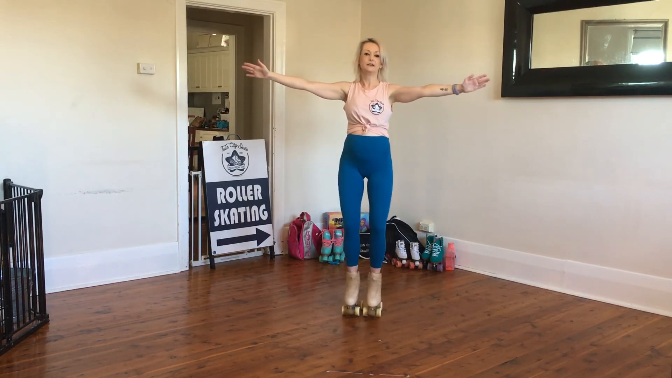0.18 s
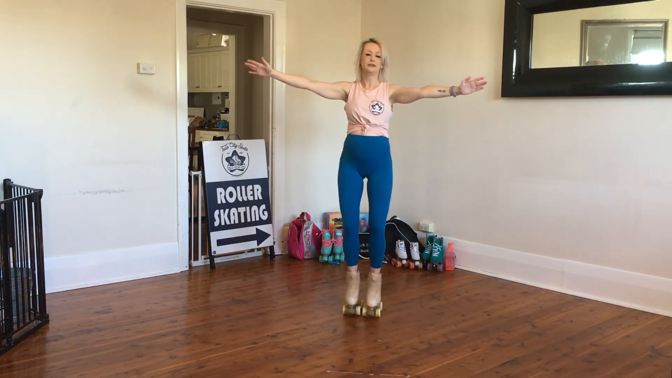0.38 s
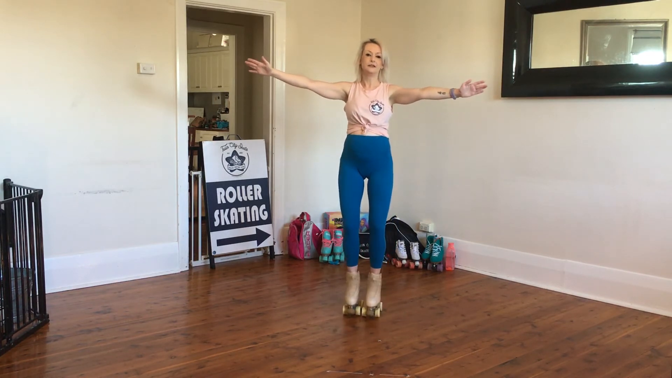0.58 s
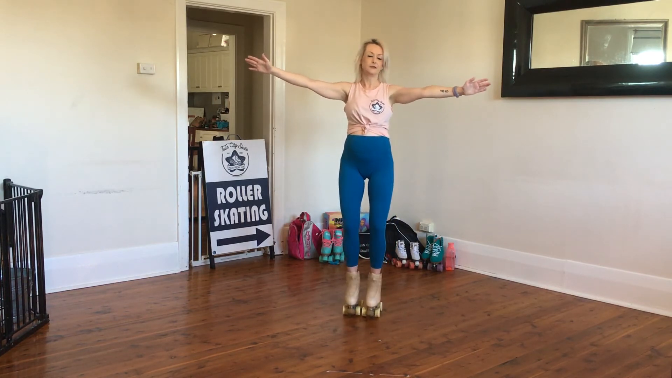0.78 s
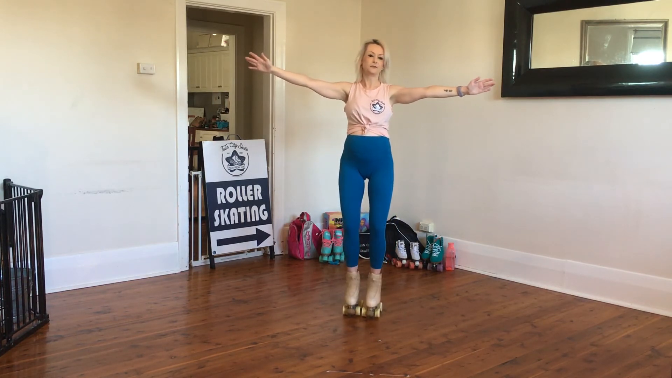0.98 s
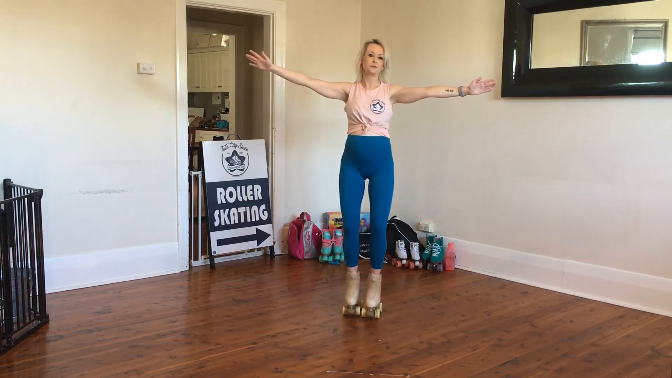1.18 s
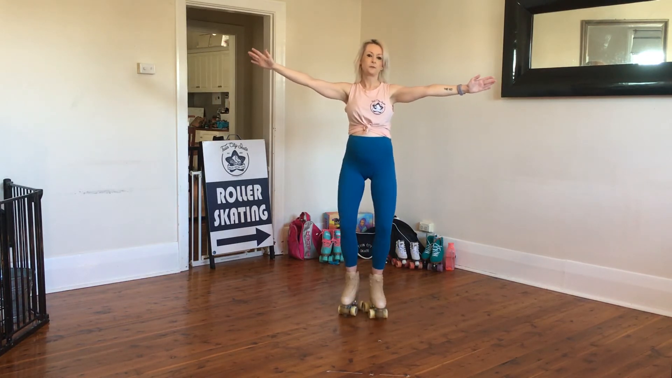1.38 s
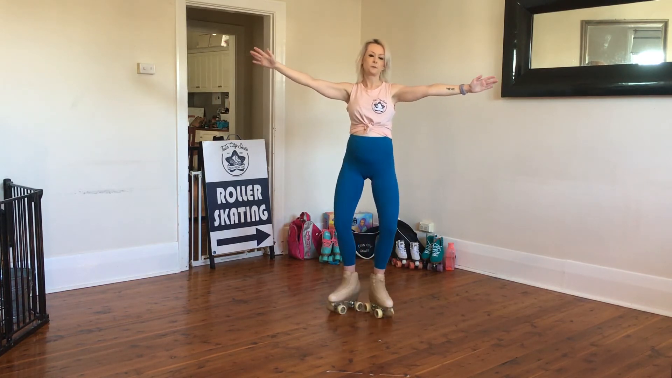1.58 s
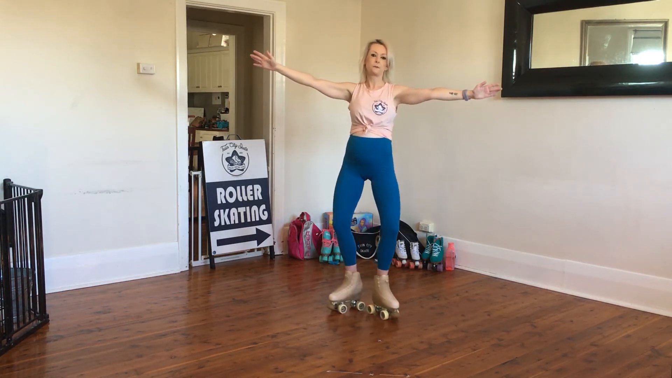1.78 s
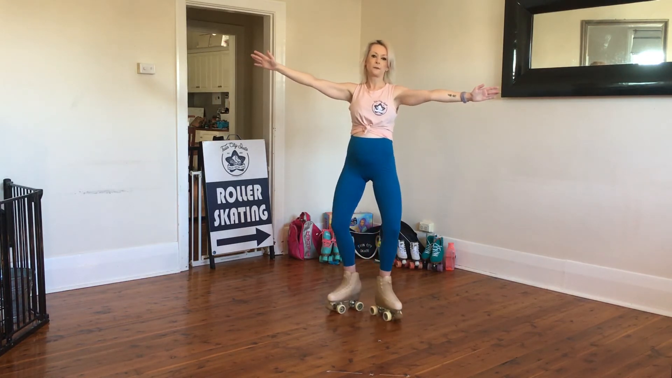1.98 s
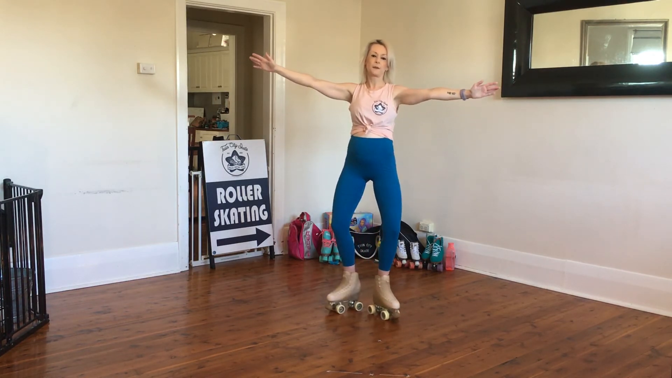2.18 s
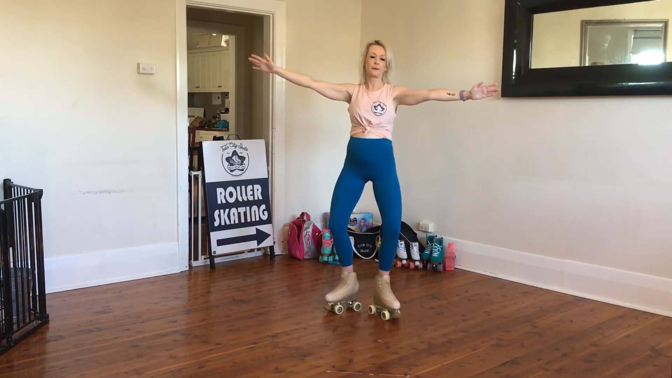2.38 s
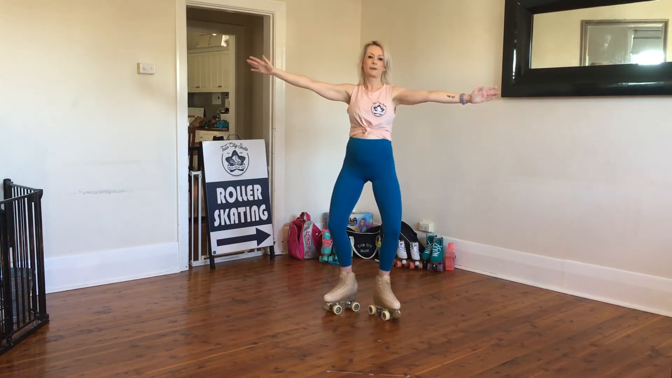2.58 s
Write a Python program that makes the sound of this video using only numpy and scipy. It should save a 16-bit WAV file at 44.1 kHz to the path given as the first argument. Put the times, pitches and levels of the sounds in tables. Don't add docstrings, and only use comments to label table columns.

```python
import sys
import numpy as np
from scipy import signal
from scipy.fft import rfft, irfft, next_fast_len
from scipy.io import wavfile
from scipy.ndimage import map_coordinates

SR = 44100
rng = np.random.default_rng(int(sys.argv[2]) if len(sys.argv) > 2 else 0)


def gain_from_decibels(decibels):
    exponent = np.asarray(decibels, float) / 20
    return 10 ** exponent


def log_audio(samples):
    frames = np.atleast_2d(samples).T
    limited = np.clip(frames, -1, 1)
    pcm = np.round(limited * 32767).astype(np.int16)
    wavfile.write(sys.argv[1], SR, pcm)


N = 114660


def skid():
    # time in seconds, slip rate in Hz, pressure in dB.
    slide_path = [
        (.226, 367.1, -50),
        (.233, 366.6, -36.5),
        (.244, 380, -32),
        (.249, 392.9, -21.5),
        (.258, 390, -23),
        (.265, 419.7, -23),
        (.272, 480, -27),
        (.279, 510, -35),
        (.29, 510, -71),
    ]
    # centre in Hz, width in Hz, level in dB.
    wheel_modes = [(409, 133, 4.5), (528.6, 52, -1), (766.5, 68, 2), (1200, 170, -17.5), (2200, 550, -20.5)]
    # frequency in Hz, level in dB per Hz.
    grit_colour = [(530, -25.5), (900, -0.5), (1350, -15), (2050, -12.5), (2820, -12.5), (3300, -15.5),
                   (6900, -19), (15500, -44.5)]
    jitter, scatter_db = 0.04, 5
    low_hz, high_hz = 300, 2500
    grit_start_s, grit_rise_s, grit_fade_s, grit_db = 0.229, 0.012, 0.029, -25

    slip_hz, pressure_db = curves(slide_path)
    turns = np.cumsum(slip_hz * (1 + jitter * wobble(150))) / SR
    slips = np.diff(np.floor(turns), prepend=0) * gain_from_decibels(scatter_db * rng.standard_normal(N))

    def soft_rubber(hz):
        low_cut = (1j * hz / (low_hz + 1j * hz)) ** 4
        high_cut = (high_hz / (high_hz + 1j * hz)) ** 2
        return low_cut * high_cut

    squeak = unit(filtered(filtered(slips, body(wheel_modes)), soft_rubber))
    touching = pressure_db > slide_path[0][2] + 1
    t = np.maximum(np.arange(N) / SR - grit_start_s, 0)
    grit = noise(grit_colour) * (1 - np.exp(-t / grit_rise_s)) * np.exp(-t / grit_fade_s)
    return gain_from_decibels(pressure_db) * touching * squeak + gain_from_decibels(grit_db) * grit


def rolling():
    # time in seconds, rolling effort in dB.
    effort_path = [(0.0, -41), (0.02, -49.5), (0.2, -46), (0.37, -63), (0.39, -65), (0.61, -72),
                   (1.13, -68), (1.17, -50), (1.32, -52.5), (1.36, -48.5), (1.41, -45.5), (1.78, -43),
                   (1.85, -50), (1.99, -52), (2.06, -62), (2.16, -52), (2.55, -78.5), (2.6, -55)]
    # centre in Hz, width in Hz, level in dB.
    board_modes = [(54.1, 16, -5.5), (116.9, 25.1, 3.5), (174, 30, -2.5), (249.8, 61.4, -3.5),
                   (354.5, 77, -13.5), (625, 15.2, -10.5), (874, 275, -28)]
    # frequency in Hz, level in dB per Hz.
    tread_colour = [(240, -25), (400, 15.5), (1110, -12), (1340, -17.5), (1590, -6.5), (3020, -27),
                    (12000, -43), (15600, -61), (22000, -120)]
    bumps_per_s, bump_scatter_db = 600, 2.5
    rumble_db, hiss_db = -2, -21
    hiss_growth = 0.8

    effort_db, = curves(effort_path)
    hits = rng.random(N) < bumps_per_s / SR
    bumps = unit(hits * rng.standard_normal(N) * gain_from_decibels(bump_scatter_db * wobble(29.904)))
    boards = body(board_modes)
    rumble = filtered(gain_from_decibels(effort_db) * bumps, boards) / np.std(filtered(bumps, boards))
    top_db = effort_db.max()
    tread_db = hiss_db + top_db + hiss_growth * (effort_db - top_db) + 1.4 * wobble(29)
    hiss = gain_from_decibels(tread_db) * noise(tread_colour)
    return gain_from_decibels(rumble_db) * rumble + hiss


def knocks():
    # start in seconds, level in dB, fade time in seconds, centre in Hz.
    joints = [(.006, -62.5, 0.22, 1080), (.06, -74.5, 0.26, 10900), (.075, -68, 0.076, 3070),
              (1.156, -58.5, .012, 2440), (1.181, -56.5, 0.014, 1070), (1.376, -54.5, 0.007, 1800),
              (1.388, -49.5, 0.027, 980), (1.399, -64, 0.089, 1620), (1.623, -55.5, 0.052, 770),
              (1.646, -57.5, 0.024, 2200), (1.665, -55.5, 0.011, 3150), (1.668, -47.5, 0.014, 890),
              (1.768, -57.5, 0.024, 726), (1.881, -55, 0.058, 830), (2.108, -56.5, 0.016, 1880),
              (2.115, -72, 0.019, 3840), (2.15, -60.5, 0.036, 670)]
    rise_s, relative_width = 0.002, 0.8
    out = np.zeros(N + SR)
    t = np.arange(SR // 5) / SR
    for start, db, fade_s, hz in joints:
        ring = body([(hz, relative_width * hz, 0)])
        scuff = unit(filtered(rng.standard_normal(len(t)), lambda f: ring(f) ** 2))
        envelope = (1 - np.exp(-t / rise_s)) * np.exp(-t / fade_s)
        out[round(start * SR):][:len(t)] += gain_from_decibels(db) * scuff * envelope
    return out[:N]


def thumps():
    # start in seconds, level in dB, pitch in Hz of the joist or board that answers.
    pushes = [
        (0.169, -48, 55.4),
        (0.251, -51, 55),
        (.34, -55.5, 62.2),
        (1.176, -43.5, 112.6),
        (1.19, -45.5, 55.6),
        (1.272, -49, 108),
        (1.42, -38, 113.3),
        (1.88, -50, 54.4),
        (1.959, -42.5, 54.8),
        (2.149, -55, 111),
    ]
    rise_s, t60_s = 0.0068, 0.4
    out = np.zeros(N + SR)
    t = np.arange(SR // 2) / SR
    for start, db, hz in pushes:
        envelope = gain_from_decibels(db - 60 * t / t60_s) * (1 - np.exp(-t / rise_s))
        out[round(start * SR):][:len(t)] += envelope * np.sin(2 * np.pi * hz * t)
    return out[:N]


def bearings():
    # time in seconds, level in dB.
    spin_path = [(0, -79), (.08, -83.5), (.22, -81.5), (.4, -93), (1.0, -92), (1.17, -82), (1.35, -82.5),
                 (1.6, -81), (1.67, -69), (1.78, -78.5), (1.9, -85), (2.6, -102)]
    # frequency in Hz, level in dB per Hz.
    whisper_colour = [(2500, -54), (4500, -13), (5400, 8.5), (7200, 8.5), (7900, -24), (13000, -18),
                      (15600, -8)]
    spin_db, = curves(spin_path)
    return gain_from_decibels(spin_db + 1.6 * wobble(24.5)) * noise(whisper_colour)


def far_walls(x):
    # delay in seconds, level in dB.
    echoes = [
        (.037, -5.5),
        (.10, -11),
        (.125, -12),
        (.165, -15.5),
    ]
    return sum(gain_from_decibels(db) * np.pad(x, (round(delay * SR), 0))[:N] for delay, db in echoes)


def room(x):
    # frequency in Hz, time to fall 60 dB in seconds.
    decay_times = [(100, 1), (400, 0.7), (2000, 0.96), (5000, 0.93), (8000, 0.56), (12000, 0.34)]
    first_wall_s = 0.0049
    hz, t, grains = signal.stft(rng.standard_normal(SR), SR, nperseg=256)
    decay = gain_from_decibels(-60 * t / along(decay_times, hz)[:, None])
    tail = signal.istft(grains * decay, SR, nperseg=256)[1]
    tail = tail * (1 - np.exp(-np.arange(len(tail)) / SR / first_wall_s))
    return signal.fftconvolve(x, tail / np.linalg.norm(tail))[:N]


def background():
    # frequency in Hz, level in dB.
    hum_tones = [(48.4, -72.5), (100.6, -63)]
    # frequency in Hz, level in dB per Hz.
    air_colour = [(15, -45.5), (25, -20), (101, -11.5), (204, -29), (260, -28), (411, -24), (849, -29),
                  (1270, -33), (15500, -47)]
    air_db, hum_wobble_db, hum_drift_rad = -66.5, 1, 0.38
    t = np.arange(N) / SR
    hum = np.zeros(N)
    for hz, db in hum_tones:
        level = gain_from_decibels(db + 2 + hum_wobble_db * wobble(11.35))
        hum += level * np.sin(2 * np.pi * hz * t + hum_drift_rad * wobble(15))
    return hum + gain_from_decibels(air_db) * noise(air_colour)


def unit(x):
    return x / np.sqrt(np.mean(x ** 2) + 1e-20)


def along(points, hz):
    f, v = np.transpose(points)
    return np.interp(np.log(hz + 1), np.log(f + 1), v)


def curves(rows):
    s, *cols = np.transpose(rows)
    return [np.interp(np.arange(N) / SR, s, c) for c in cols]


def wobble(rate):
    return map_coordinates(rng.standard_normal(N // 100), [np.arange(N) * rate / SR])


def filtered(x, response):
    m = next_fast_len(len(x) + SR // 2)
    return irfft(rfft(x, m) * response(np.fft.rfftfreq(m, 1 / SR)), m)[:len(x)]


def body(peaks):
    def response(f):
        total = 0
        for k, (centre, width, db) in enumerate(peaks):
            damping = 1j * f * width
            total = total + (-1) ** k * gain_from_decibels(db) * damping / (centre * centre - f * f + damping)
        return total
    return response


def noise(spectrum):
    return unit(filtered(rng.standard_normal(N), lambda hz: gain_from_decibels(along(spectrum, hz))))


def scene():
    slide, taps = skid(), knocks()
    roll = rolling() + thumps() + bearings()
    room_db, roll_room_db, taps_db = -1, -10.5, -0.5
    wet = room(gain_from_decibels(room_db) * (slide + taps) + gain_from_decibels(roll_room_db) * roll)
    direct = slide + gain_from_decibels(taps_db) * taps + roll
    return (direct + far_walls(slide) + wet + background())[None]


def roll_off(x):
    return signal.sosfilt(signal.butter(12, 15690, fs=SR, output="sos"), x)


def record(dry):
    # frequency in Hz, gain in dB.
    mic_colour = [(20, 6), (40, 1.5), (3900, -1.09), (4850, -6), (5500, -3), (7300, -3.5), (8000, -3),
                  (10500, -3)]
    top_hz = 15700
    mix = filtered(dry[0], lambda hz: gain_from_decibels(along(mic_colour, hz)) * (hz < top_hz))[None]
    return roll_off(mix)


dry = scene()
out = record(dry)
log_audio(out)
```